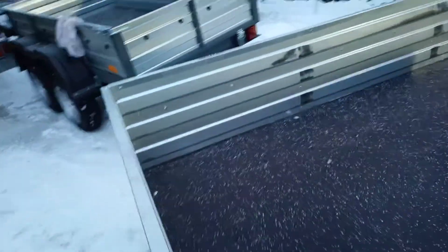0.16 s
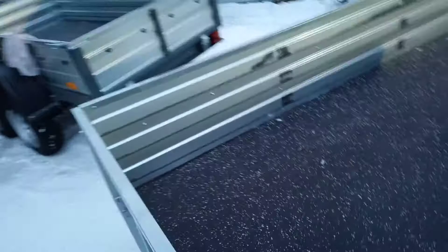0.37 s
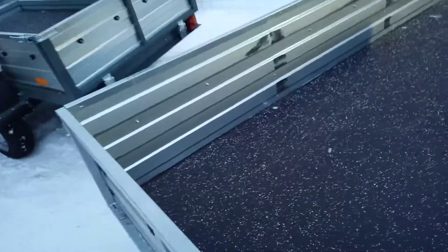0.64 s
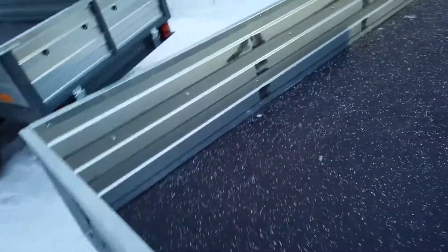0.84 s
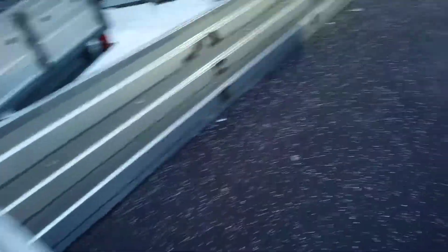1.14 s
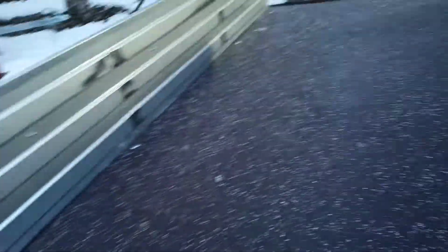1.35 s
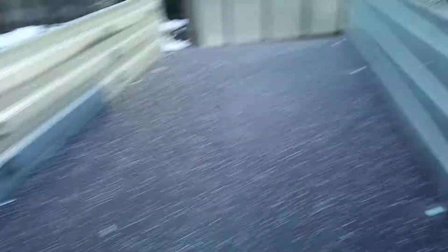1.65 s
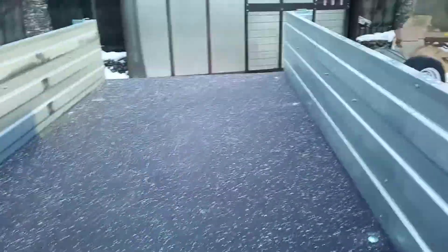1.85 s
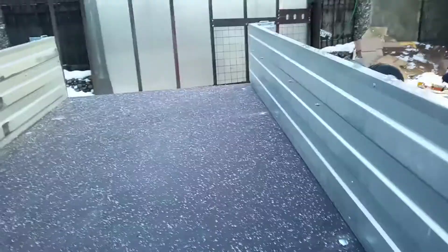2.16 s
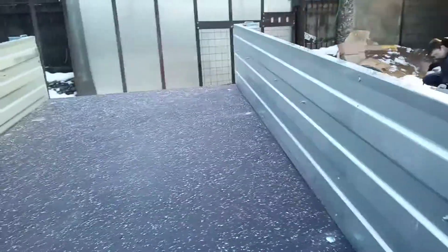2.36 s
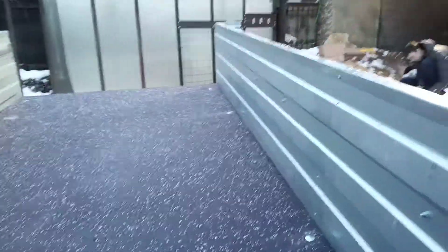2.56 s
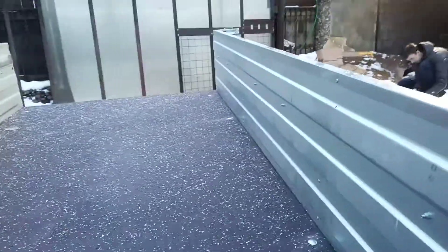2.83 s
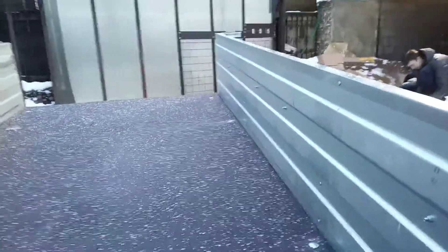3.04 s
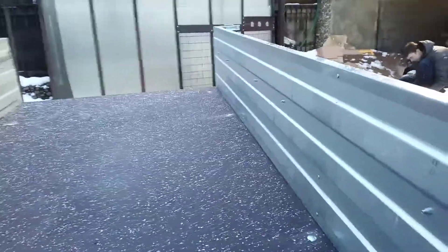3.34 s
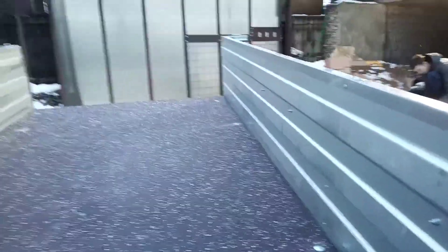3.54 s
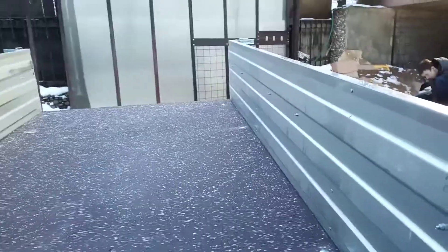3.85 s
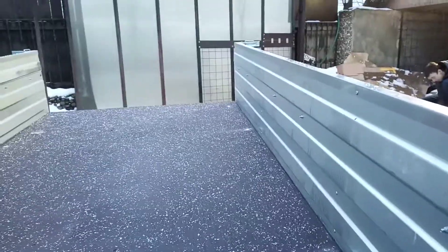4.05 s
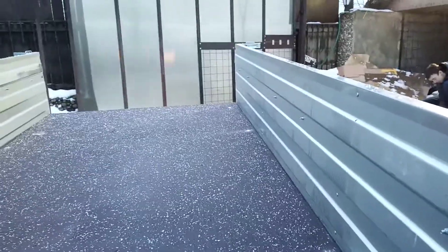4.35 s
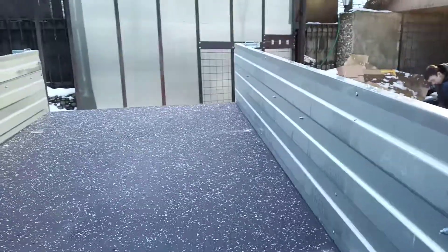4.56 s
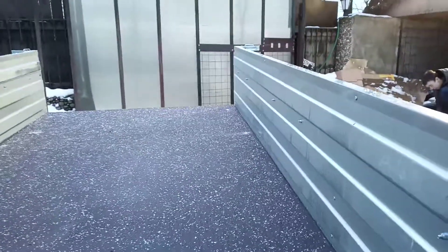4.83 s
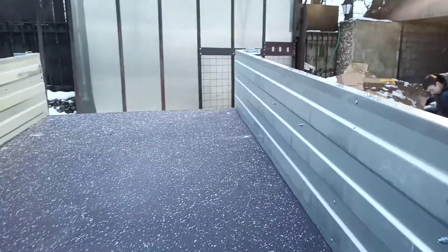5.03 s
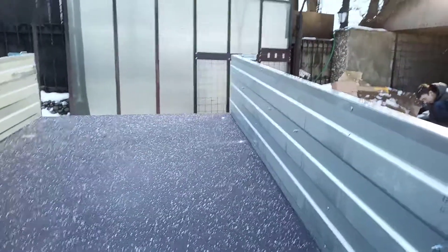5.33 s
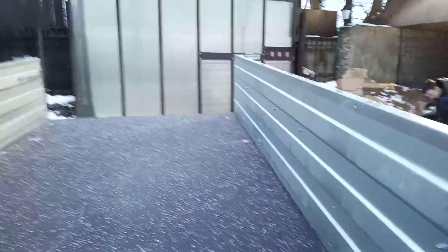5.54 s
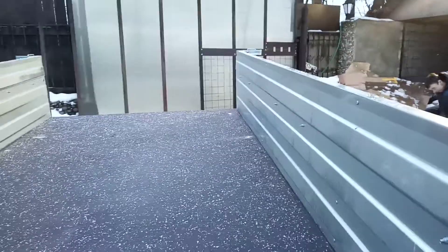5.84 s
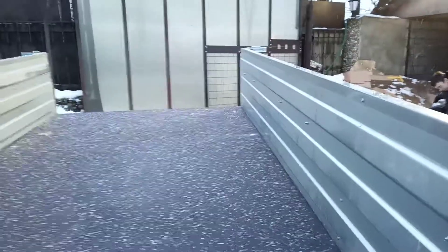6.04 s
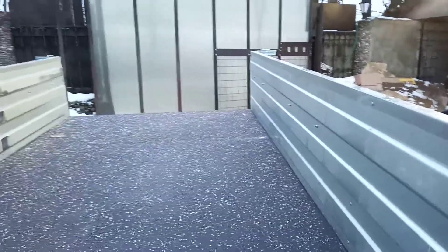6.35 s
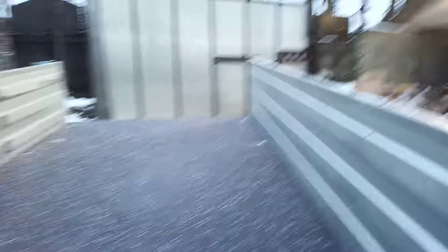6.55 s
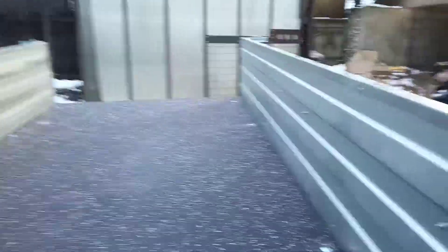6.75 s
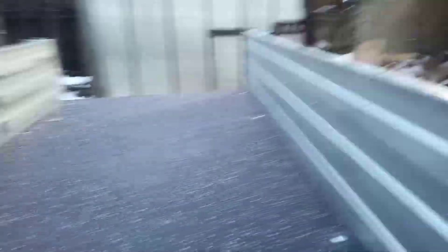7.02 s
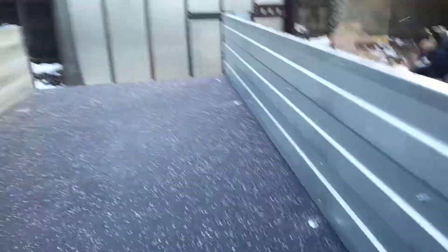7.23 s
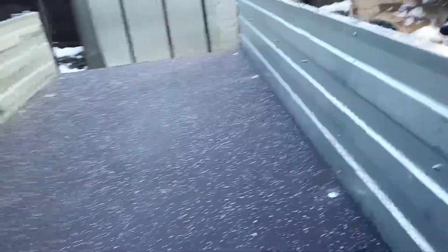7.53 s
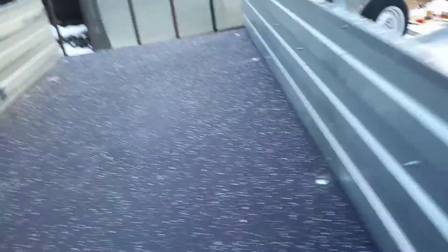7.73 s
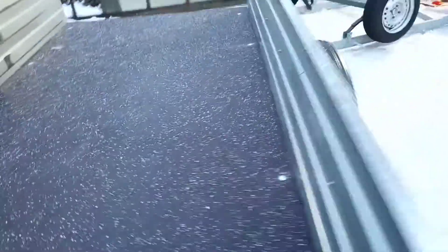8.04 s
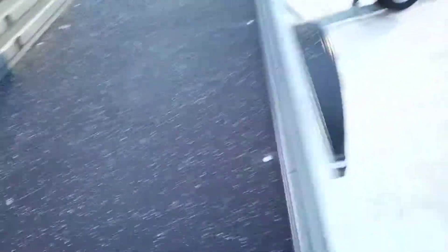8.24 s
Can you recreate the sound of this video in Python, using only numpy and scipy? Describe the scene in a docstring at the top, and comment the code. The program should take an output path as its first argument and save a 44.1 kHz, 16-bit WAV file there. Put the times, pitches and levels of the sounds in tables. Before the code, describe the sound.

A flat trailer bed drops on its metal frame, bouncing faster with hollow booms, then steel latches clank and a rod squeaks briefly.

```python
"""In a quiet, snowy yard, a tipping car trailer with a plywood deck and sheet-steel sides is handled.
The bed drops on its frame and bounces ever faster: bursts of noise for the frame and steel, fading
sine waves for the deck. Steel latches clank, ring and scuff, and a sliding latch rod rasps and squeaks.
Shaped noise makes the deck's rumble under the hand, a jacket's rustle and a faint outdoor hush."""
import sys
import numpy as np
from scipy import signal
from scipy.fft import rfft
from scipy.io import wavfile

SR = 44100
rng = np.random.default_rng(int(sys.argv[2]) if len(sys.argv) > 2 else 0)


def wav_record(signal):
    """Record a signal, one row per channel, as 16-bit PCM in the file named by sys.argv[1]."""
    frames = np.transpose(np.atleast_2d(signal))
    bounded = np.clip(frames, -1, 1)
    # unit amplitude maps onto the largest positive 16-bit level
    quanta = np.round(bounded * 32767).astype(np.int16)
    wavfile.write(sys.argv[1], SR, quanta)


N = 369814

# Ringing tones of the plywood deck: (pitch [Hz], level [dB], time to fade by 60 dB [s])
DECK_MODES = [(57.6, -35, 0.79), (89, -17, 0.48), (104.4, -16.5, 0.79), (125.8, -6, 0.77),
              (169, -4.5, 0.51), (206.5, 0, 0.37), (226.4, -0.5, 0.23), (265, -4.5, 0.3), (315, -8, 0.25),
              (354.4, -16.5, 0.21), (421.5, -19, 0.38), (473, -23, 0.4), (569, -22, 0.22)]
# Ringing tones of the steel sides and fittings: (pitch [Hz], level [dB], time to fade by 60 dB [s])
STEEL_MODES = [(1233, 1, 0.51), (1406, 0, 0.39), (2086, 6, 0.42), (2290, 6, 0.34), (2360, 1, 0.2),
               (2500, 6, .39), (2610, -4, 0.36), (2820, 3, 0.3), (2710, -12, .33), (2770, -9, 0.5),
               (3445, -3, 0.28), (3750, -18, 0.156), (4670, -4, .25), (4960, -1.5, 0.18), (5250, -16, 0.2),
               (5430, -0.5, 0.42), (6020, 15, .25), (6300, 6, 0.12), (6500, 5, 0.21), (6660, -7, .25),
               (7300, -4, 0.21)]
# Tone colour of the frame's many crowded tones: (frequency [Hz], level [dB])
FRAME_COLOUR = [(30, -42), (60, -20.5), (120, 8.5), (300, 6.5), (450, 4.5), (640, -0.5), (850, 3),
                (1100, -3), (1400, -1.5), (1800, -1.5), (2600, -8.5), (5000, -33.5)]
# Tone colour of the sheet steel's many crowded tones: (frequency [Hz], level [dB])
STEEL_COLOUR = [(600, -44.5), (1400, -16), (2000, -13.5), (2700, -1), (3400, -7), (4300, -5.5), (5300, -2),
                (6500, 4), (7200, -9), (8100, -14), (10200, -12.5), (13500, -16), (15500, -23)]
# Strikes of latches and fittings: (time [s], steel level [dB], frame level [dB], deck level [dB],
# brightness [dB per octave], pitch [Hz], time for the crack to fade by 60 dB [s])
LATCH_STRIKES = [(3.13, -26, -44, -48, -2, 4840, 0.13), (3.225, -16.5, -25.5, -29.5, -3, 6100, 0.069),
                 (3.532, -43.5, -47, -55, -9, 6000, .1), (3.57, -45, -57, -51.5, -5, 4830, 0.12),
                 (3.681, -43, -60, -65, -6, 4460, 0.083), (3.772, -26, -35.5, -42.5, -7.5, 6600, 0.071),
                 (4.146, -39.5, -44.5, -55, -9.5, 2260, .13), (4.4, -22, -36.5, -39.5, -6, 2370, .08),
                 (4.41, -21, -46, -40.5, -22, 1580, 0.071), (4.703, -32.5, -46.5, -53, -20, 2580, 0.095),
                 (5.021, -45.5, -48, -53, -9, 2290, 0.13), (6.035, -28, -45, -55, -10, 2590, .075),
                 (6.206, -26.5, -43.5, -48.5, -8.5, 2170, 0.083),
                 (6.86, -34.5, -31.5, -41, -0.5, 2680, .09), (6.886, -14, -36, -48, -7.5, 2370, 0.076),
                 (7.134, -37, -41, -41, -8, 2450, .07)]
RING_S = 0.8   # length made for each landing, rattle and clank


def from_db(db):
    """Turn decibels into a gain."""
    return 10 ** (np.asarray(db) / 20)


def rms_one(x):
    """Scale a sound to an average strength (rms) of 1."""
    return x / np.sqrt(np.mean(x ** 2) + 1e-20)


def seconds(length_s):
    """Give the time of each sample in a short sound."""
    return np.arange(round(length_s * SR)) / SR


def sine(hz, t):
    """A pure tone."""
    return np.sin(2 * np.pi * hz * t)


def gain_curve(rows):
    """Join points of (time [s], level [dB]) into a gain for every sample."""
    return from_db(np.interp(np.arange(N) / SR, *np.transpose(rows)))


def dying(t, t60):
    """A fade that falls by 60 dB in t60 seconds."""
    return np.exp(-np.log(1000) * t / max(t60, 1e-3))


def contact(t, rise_s):
    """The force of a blow builds steadily over a moment."""
    return np.minimum(t / max(rise_s, 1e-4), 1)


def add(track, s, sound):
    """Mix a sound into the track at time s."""
    start = max(round(s * SR), 0)
    track[start:start + len(sound)] += sound[:N - start]


def bins(size):
    """Frequencies of a spectrum in Hz, kept above zero."""
    return np.maximum(np.fft.rfftfreq(size, 1 / SR), 1)


def at_hz(points, hz):
    """Read a tone colour in dB between its points, on a log-frequency scale."""
    corner_hz, db = np.transpose(points)
    return np.interp(np.log(hz), np.log(corner_hz), db)


def noise(shape_db, size):
    """Noise of rms 1 whose spectrum follows the given shape in dB."""
    spectrum = rfft(rng.standard_normal(size)) * from_db(shape_db)
    return rms_one(np.fft.irfft(spectrum, size))


def flutter(per_s, depth_db):
    """A gain that wanders at random, with per_s new values each second."""
    knots = np.arange(N) / SR * per_s
    return from_db(depth_db * np.interp(knots, np.arange(N), rng.standard_normal(N)))


def peak(hz, centre_hz, width_hz):
    """A resonance bump of height 1."""
    return 1 / (1 + (2 * (hz - centre_hz) / width_hz) ** 2)


def sheet_resonances(hz, peak_db=4, width_hz=90, ripple_db=4.5, spacing_hz=55):
    """Ups and downs in dB: the steel's strong tones stand out over a random ripple of weaker ones."""
    strong = np.max([peak(hz, f, width_hz) for f, db, t60 in STEEL_MODES], axis=0)
    weak = np.interp(hz / spacing_hz, np.arange(len(hz)), rng.standard_normal(len(hz)))
    return peak_db * strong + ripple_db * weak


def frame_crack(t, crack_t60, tail_db, tail_t60):
    """The frame's crowded tones sound as noise: a short crack and a softer tail."""
    hz = bins(len(t))
    shape = at_hz(FRAME_COLOUR, hz) + sheet_resonances(hz, ripple_db=3.0, spacing_hz=30)
    fade = np.hypot(dying(t, crack_t60), from_db(tail_db) * dying(t, tail_t60))
    return noise(shape, len(t)) * fade


def steel_crack(t, bright, ring_hz, ring_db, ring_width_hz, crack_t60, tail_db, tail_t60,
                modes_db, tail_dull_db):
    """Sheet steel cracks and rings on; harder contact is brighter, and one pitch region is favoured."""
    hz = bins(len(t))
    octaves = np.log2(np.maximum(hz, 1500) / 4000)
    colour = bright * octaves + ring_db * peak(hz, ring_hz, ring_width_hz)
    shape = at_hz(STEEL_COLOUR, hz) + sheet_resonances(hz) + colour

    mode_hz, mode_db, mode_t60 = np.transpose(STEEL_MODES)
    rings = np.array([sine(f, t) * dying(t, t60) for f, t60 in zip(mode_hz, mode_t60)])
    strength = from_db(mode_db + np.interp(mode_hz, hz, colour)) * rng.standard_normal(len(mode_hz))
    clear_tones = from_db(modes_db) * (strength / np.linalg.norm(strength)) @ rings

    wash = noise(shape + tail_dull_db * np.maximum(octaves, 0), len(t)) * dying(t, tail_t60)
    crack = noise(shape, len(t)) * dying(t, crack_t60)
    return crack + from_db(tail_db) * (wash + clear_tones)


def deck_boom(t, slope_db, centre_hz, focus_db):
    """The deck's low tones throb, most near centre_hz; a quick first push leaves a softer drone."""
    hz, db, t60 = np.transpose(DECK_MODES)
    focus = focus_db * peak(hz, centre_hz, width_hz=70)
    spread = 4.5 * rng.standard_normal(len(hz))   # dB
    strength = from_db(db + slope_db * np.log2(hz / 200) + focus + spread)
    strength = strength * (-1) ** np.arange(len(hz))   # neighbours push in opposite directions
    hz = hz * (1 + 0.031 * rng.standard_normal(len(hz)))   # each boom's tones vary a little in pitch
    boom = sum(gain * sine(f, t) * dying(t, fade) for gain, f, fade in zip(strength, hz, t60))
    boom = boom * (np.exp(-t / 0.093) + from_db(-10))   # first push, then drone
    return boom / boom[:SR // 20].std()


def rocking_boom(t, slope_db, rock_db, rock_s, centre_hz=230, focus_db=2):
    """The deck booms, and again as its far side lands rock_s later."""
    near = deck_boom(t, slope_db, centre_hz, focus_db)
    far = deck_boom(t, slope_db, centre_hz=215, focus_db=4)
    return near + from_db(rock_db) * np.interp(t - rock_s, t, far, left=0)


def yard(level_db=4):
    """The hush of the open air: shaped noise that wavers a little and slowly changes level."""
    # Level of the hush: (time [s], level [dB])
    hush_level = [(0, -55.5), (.33, -57.5), (1.4, -56.5), (1.7, -59.5), (2.2, -57), (2.9, -56.5),
                  (3.9, -53), (4.95, -54), (5.15, -55), (5.5, -58.5), (5.85, -59), (6.2, -60),
                  (6.75, -60.5), (7.05, -55.5), (7.57, -59), (8.39, -60.5)]
    # Tone colour of the open air: (frequency [Hz], level [dB])
    air_colour = [(25, -10), (40, 0), (57, 14), (90, 4), (200, 1), (400, -12), (700, -12), (950, -6.5),
                  (1320, 4), (1850, -4.5), (2550, -2.5), (3700, -13.5), (6300, -8), (8000, -33.5),
                  (11500, -32), (13500, -41), (16000, -40)]
    air = noise(at_hz(air_colour, bins(N)), N)
    return from_db(level_db) * gain_curve(hush_level) * flutter(9, 0.8) * air


def rumble(level_db=-0.5, width_hz=32, lumpy_db=3.5, hand_cut_hz=420):
    """Small uneven pushes of the hand keep the deck's tones murmuring."""
    # Murmur of the deck under the hand: (time [s], level [dB])
    murmur_level = [(0.0, -63), (0.14, -47.5), (0.35, -42), (1.54, -55.5), (1.77, -68.5), (2.3, -60.5),
                    (2.65, -74), (2.85, -57), (3.27, -52.5), (4.1, -57), (4.48, -46), (5.0, -55.5),
                    (5.7, -54), (6.14, -72), (6.58, -53), (6.94, -41.5), (7.31, -44.5), (7.55, -55.5),
                    (8.39, -59.5)]
    hz = bins(N)
    power = sum(from_db(db) ** 2 / (1 + ((hz ** 2 - f ** 2) / (hz * width_hz)) ** 2)
                for f, db, t60 in DECK_MODES)
    soft = 1 / (1 + (hz / hand_cut_hz) ** 4)   # a hand is too soft to stir the treble
    murmur = noise(10 * np.log10(power * soft), N)
    return from_db(level_db) * gain_curve(murmur_level) * flutter(40, lumpy_db) * murmur


def bumps(deck_db=-1, frame_db=-4, firm_db=-37, frame_growth=0.96):
    """The handler bumps the bed: soft bumps mostly stir the deck; firm ones also crack in the frame."""
    # Bumps of the bed: (time [s], level [dB])
    bump_blows = [(0.111, -52), (1.63, -44.5), (1.97, -56), (2.2, -51), (2.25, -52), (2.819, -48.5),
                  (2.92, -51.5), (3.062, -44), (3.322, -35), (3.43, -49.5), (3.533, -48), (4.44, -37.5),
                  (4.511, -44), (5.069, -55), (5.25, -54), (5.421, -55.5), (5.53, -56), (5.63, -47.5),
                  (5.741, -45), (6.0, -53), (6.41, -55), (6.6, -46.5), (6.729, -36.5), (6.859, -40),
                  (6.985, -39), (7.03, -43), (7.149, -40), (7.315, -42), (7.445, -40.5), (7.62, -54),
                  (7.745, -45), (7.843, -45), (7.945, -46), (8.339, -49.5)]
    out, t = np.zeros(N), seconds(0.5)
    for s, db in bump_blows:
        # below firm_db, the frame's share shrinks with the bump
        firmness = from_db(frame_db + frame_growth * min(db - firm_db, 0))
        crack = frame_crack(t, crack_t60=0.13, tail_db=-4.0, tail_t60=0.21)
        frame = firmness * contact(t, rise_s=0.0013) * crack
        boom = rocking_boom(t, slope_db=-1.5, rock_db=-5.5, rock_s=0.024)
        deck = from_db(deck_db) * contact(t, rise_s=0.0049) * boom
        add(out, s, from_db(db) * (deck + frame))
    return out


def grit_snaps(t60=0.0078, width_octaves=0.41, skirt_db=-24):
    """Grit under the moving steel snaps and dies at once, each snap at its own pitch."""
    # Snaps of grit: (time [s], level [dB], centre of the noise [Hz])
    snap_blows = [(.135, -45, 5500), (.173, -26, 13000), (.22, -28, 6500), (.429, -33, 6700),
                  (.872, -41.5, 5600), (5.807, -47, 6400)]
    out, t = np.zeros(N), seconds(0.05)
    octaves = np.log2(bins(len(t)))
    for s, db, hz in snap_blows:
        shape = skirt_db * (1 - peak(octaves, np.log2(hz), 2 * width_octaves))
        add(out, s, from_db(db) * noise(shape, len(t)) * dying(t, t60))
    return out


def bounces(steel_db=-9.5, sway_reference_db=-17.5):
    """The bed lands ever faster and mostly weaker on its frame; heavy landings sway it more."""
    # Each landing in turn: (frame level [dB], deck level [dB], centre of the boom [Hz],
    # far side against near side [dB])
    landing_blows = [(-21, -21.5, 273, -13), (-21, -24, 214, 1), (-31.5, -29.5, 298, 3),
                     (-33.5, -37.5, 157, 0.5), (-30.5, -34, 150, -1), (-38, -38, 140, -1.5),
                     (-41.5, -42, 150, 1.5), (-40, -41.5, 150, -0.5), (-45.5, -44.5, 180, 0.5)]
    drop_s, first_gap_s, gap_kept = 0.168, 0.2115, 0.9195   # each gap is a fixed share of the last
    sway_db, sway_growth, sway_rise_s = -4, 0.6, 0.052   # sway_growth: dB per dB of the blow
    out, t = np.zeros(N), seconds(RING_S)
    s = drop_s
    for k, (frame_db, deck_db, centre_hz, rock_db) in enumerate(landing_blows):
        frame = frame_crack(t, crack_t60=0.12, tail_db=-8.0, tail_t60=0.41)
        steel = steel_crack(t, bright=-0.5, ring_hz=2010, ring_db=5.0, ring_width_hz=2800,
                            crack_t60=0.18, tail_db=-6.5, tail_t60=0.54, modes_db=-13,
                            tail_dull_db=-25)
        metal = contact(t, rise_s=0.0011) * (frame + from_db(steel_db) * steel)

        boom = rocking_boom(t, slope_db=0, rock_db=rock_db, rock_s=0.021,
                            centre_hz=centre_hz, focus_db=14.0)
        sway_hz = 86 * (1 + 0.1 * rng.standard_normal())
        # the sway's strength is reckoned from a reference landing level
        sway_gain = from_db(sway_db + sway_growth * (frame_db - sway_reference_db))
        sway_fade = contact(t, sway_rise_s) * dying(np.maximum(t - sway_rise_s, 0), t60=0.26)
        sway = sway_gain * sine(sway_hz, t) * sway_fade
        deck = contact(t, rise_s=0.008) * boom + sway

        add(out, s, from_db(deck_db) * deck + from_db(frame_db) * metal)
        s += first_gap_s * gap_kept ** k
    return out


def rattles(hinge_db=-3, spread_db=3, detune=0.006):
    """A loose steel side slaps its hinge with a bright, high ring."""
    # Slaps of the loose side: (time [s], level [dB], brightness [dB per octave])
    side_slaps = [(.183, -32, 7), (.208, -35.5, -6), (.241, -27.5, 2.5), (0.394, -31.5, 4.5),
                  (0.593, -40, 1.5), (.764, -47, 4.5), (.924, -45.5, 3), (1.06, -42, 13), (1.347, -49, 4)]
    # Ringing tones of the hinge: (pitch [Hz], level [dB], time to fade by 60 dB [s])
    hinge_modes = [(6120, -5.5, 0.14), (6250, -1, 0.17), (6500, -7.5, .16), (9372, -17, 0.35),
                   (9560, -18.5, .14), (10120, -11, .12)]
    out, t = np.zeros(N), seconds(RING_S)
    for s, db, bright in side_slaps:
        steel = steel_crack(t, bright, ring_hz=6440, ring_db=2.0, ring_width_hz=320,
                            crack_t60=0.19, tail_db=-10.5, tail_t60=0.45, modes_db=-1.0,
                            tail_dull_db=-21)
        hinge = np.zeros(len(t))
        for hz, mode_db, t60 in hinge_modes:
            gain = from_db(mode_db + spread_db * rng.standard_normal())
            pitch_hz = hz * (1 + detune * rng.standard_normal())
            hinge += gain * sine(pitch_hz, t) * dying(t, t60)
        slap = contact(t, rise_s=0.0012) * (steel + from_db(hinge_db) * hinge)
        add(out, s, from_db(db) * slap)
    return out


def jacket(level_db=6, grain_db=3.5):
    """Fabric slides on fabric in smooth strokes: a fine, grainy hiss."""
    # Strokes of the sleeve: (middle [s], level [dB], half length [s])
    sleeve_strokes = [(1.1, -62, 0.29), (2.165, -58.5, 0.15), (2.958, -64.5, 0.051), (3.656, -66.5, 0.08),
                      (5.252, -65, 0.089), (5.663, -64, 0.028), (6, -68, 0.11), (6.486, -58.5, 0.027),
                      (7.325, -60, 0.078), (7.82, -69.5, 0.17), (8.14, -60.5, 0.1)]
    # Tone colour of the cloth: (frequency [Hz], level [dB])
    cloth_colour = [(800, 14), (1400, 16), (2600, 16.5), (3600, 9.5), (5000, 14), (6400, 21.5), (7300, 9.5),
                    (8300, -2), (11500, 7.5), (13500, -2), (15500, 8.5)]
    t = np.arange(N) / SR
    speed = sum(from_db(db) * np.exp(-0.5 * ((t - s) / half) ** 2) for s, db, half in sleeve_strokes)
    hiss = noise(at_hz(cloth_colour, bins(N)), N)
    return from_db(level_db) * speed * flutter(180, grain_db) * hiss


def scuffs(grain_db=4.0, grains_per_s=420, steel_db=-3, top_hz=8500, ring_db=7, ring_width_hz=800):
    """Short gritty rubs of steel on the frame swell and die away."""
    # Rubs: (time [s], level [dB], rise [s], time to fade by 60 dB [s],
    # brightness [dB per octave], favoured pitch [Hz])
    steel_rubs = [(2.812, -38, .012, 0.3, 3.5, 2500), (2.988, -48.5, .018, .13, 3, 2400),
                  (3.025, -45.5, .016, 0.17, 0, 2400), (6.199, -36, 0.0078, 0.07, 2.5, 2500),
                  (6.728, -37.5, .003, 0.28, -3, 1930), (6.873, -35, 0.013, .08, 1, 2400),
                  (6.959, -45, 0.01, 0.21, -4, 2400), (7.314, -39.5, 0.0093, 0.23, -4.5, 1450),
                  (7.431, -37.5, 0.0027, 0.19, -4.5, 1500), (7.48, -42, 0.017, 0.07, -2, 1910)]
    out, t = np.zeros(N), seconds(0.5)
    hz = bins(len(t))
    frame = from_db(at_hz(FRAME_COLOUR, hz))
    steel = from_db(at_hz(STEEL_COLOUR, hz) + steel_db)
    both = np.hypot(frame, steel) / np.sqrt(1 + (hz / top_hz) ** 4)   # softer above top_hz
    for s, db, rise_s, t60, bright, ring_hz in steel_rubs:
        tilt = bright * np.log2(np.clip(hz, 200, 6000) / 1000)
        ring = ring_db * peak(hz, ring_hz, ring_width_hz)
        shape = 20 * np.log10(both) + sheet_resonances(hz) + tilt + ring
        swell = contact(t, rise_s) * dying(np.maximum(t - rise_s, 0), t60)
        grit = rms_one(flutter(grains_per_s, grain_db)[:len(t)])
        add(out, s, from_db(db) * swell * grit * noise(shape, len(t)))
    return out


def bolt(spread_db=3.5):
    """The latch bolt rings with a few clear tones, some in close pairs."""
    # Strikes on the bolt: (time [s], level [dB])
    bolt_strikes = [(2.822, -36.5), (3.13, -26), (3.226, -29), (3.572, -43.5), (3.683, -47)]
    # Ringing tones of the bolt: (pitch [Hz], level [dB], time to fade by 60 dB [s])
    bolt_modes = [(2385, -3, 0.14), (4160, -1.5, 0.081), (4760, -7, 0.13), (4920, -4.5, 0.13),
                  (5140, -10, 0.13), (6170, -11, 0.14), (6230, -0.5, 0.08), (6662, -17, 0.15),
                  (7300, -14, .16)]
    out, t = np.zeros(N), seconds(0.5)
    for s, db in bolt_strikes:
        ring = np.zeros(len(t))
        for hz, mode_db, t60 in bolt_modes:
            gain = from_db(mode_db + spread_db * rng.standard_normal())
            tone = np.sin(2 * np.pi * (hz * t + rng.random()))   # starts anywhere in its cycle
            ring += gain * tone * dying(t, t60)
        add(out, s, from_db(db) * contact(t, rise_s=0.0023) * ring)
    return out


def latches(tail_db=-6, tail_db_per_bright=1.3, rise_cycles=7):
    """Clanks crack in the steel and jolt frame and deck; bright strikes ring on, dull ones are damped."""
    out, t = np.zeros(N), seconds(RING_S)
    for s, steel_db, frame_db, deck_db, bright, hz, crack_t60 in LATCH_STRIKES:
        steel = steel_crack(t, bright, hz, ring_db=4.5, ring_width_hz=1000, crack_t60=crack_t60,
                            tail_db=tail_db + tail_db_per_bright * min(bright, 0),
                            tail_t60=0.32, modes_db=-3, tail_dull_db=-3)
        frame = frame_crack(t, crack_t60=0.082, tail_db=-4.5, tail_t60=0.46)
        deck = rocking_boom(t, slope_db=7.5, rock_db=-6.5, rock_s=0.026)
        clank = from_db(steel_db) * steel + from_db(frame_db) * frame + from_db(deck_db) * deck
        add(out, s, contact(t, rise_cycles / hz) * clank)
    return out


def latch_ticks(ping_db=-8, ping_db_per_bright=3.0, snap_db=-1, snap_db_per_bright=3.3):
    """Strikes begin with a brief snap and a very high ping of a small, hard part; dull ones have less."""
    out, t = np.zeros(N), seconds(0.2)
    hz = bins(len(t))
    ping_shape = 20 * np.log10(peak(hz, centre_hz=15600, width_hz=1200))
    snap_shape = at_hz(STEEL_COLOUR, hz) + 3 * np.log2(hz)   # 3 dB brighter per octave
    for s, steel_db, frame_db, deck_db, bright, pitch_hz, crack_t60 in LATCH_STRIKES:
        dullness = min(bright, 0)
        ping_gain = from_db(ping_db + ping_db_per_bright * dullness)
        ping = ping_gain * noise(ping_shape, len(t)) * dying(t, t60=0.05)
        snap_gain = from_db(snap_db + snap_db_per_bright * dullness)
        snap = snap_gain * noise(snap_shape, len(t)) * dying(t, t60=0.033)
        add(out, s, from_db(steel_db) * (ping + snap))
    return out


def rasp(start_s=6.91, level_db=-39.5, frame_db=-1.0, steel_db=-3.0):
    """Under its squeaks the latch rod grates along its guide: dense, grainy noise that fades away."""
    out, t = np.zeros(N), seconds(1)
    hz = bins(len(t))
    frame = noise(at_hz(FRAME_COLOUR, hz) + sheet_resonances(hz), len(t))
    tilt = -7.0 * np.log2(hz / 4000)   # 7 dB duller per octave
    rod = 3 * peak(hz, centre_hz=2450, width_hz=1300)
    steel = noise(at_hz(STEEL_COLOUR, hz) + sheet_resonances(hz) + tilt + rod, len(t))
    grains = flutter(per_s=700, depth_db=3.2)[:len(t)]
    sliding = contact(t, rise_s=0.012) * dying(t, t60=1.3) * grains
    grating = from_db(frame_db) * frame + from_db(steel_db) * steel
    add(out, start_s, from_db(level_db) * sliding * grating)
    return out


def squeaks(ring_db=-3, grit_db=-6):
    """The rod sticks and slips evenly; each slip squeaks upward as it speeds up, grates and rings."""
    first_slip_s, slip_gap_s, slip_count = 6.971, 0.0272, 12
    hardest_slip_s, slip_db, fade_db_per_s = 7, -33.5, 33   # slips swell to this moment, then fade
    last_slip_db, limp_db, spread_db = 2, 1.5, 1.0   # closing jerk; every other slip is stronger
    start_hz, end_hz, length_s, pitch_spread = 1950, 3150, 0.0076, 0.033
    out, t = np.zeros(N), seconds(0.2)
    progress = np.minimum(t / length_s, 1)
    hz = bins(len(t))
    grit_shape = at_hz(STEEL_COLOUR, hz) - 10 * np.log2(hz)   # 10 dB duller per octave
    for k in range(slip_count):
        s = first_slip_s + slip_gap_s * k
        db = slip_db - fade_db_per_s * abs(s - hardest_slip_s)
        db += last_slip_db * (k == slip_count - 1) - limp_db * (-1) ** k
        db += spread_db * rng.standard_normal()

        pitch = start_hz + (end_hz - start_hz) * progress
        pitch = pitch * (1 + pitch_spread * rng.standard_normal())
        rough = rms_one(flutter(1400, 3.5)[:len(t)])
        sweep = rough * np.sin(np.pi * progress) * np.sin(2 * np.pi * np.cumsum(pitch) / SR)

        # the squeak sets the steel ringing: spread it out over fading noise
        steel = rng.standard_normal(len(t)) * dying(t, t60=0.1)
        ringing = signal.fftconvolve(sweep, steel / np.linalg.norm(steel))[:len(t)]
        grit = noise(grit_shape, len(t)) * dying(t, t60=0.068)
        add(out, s, from_db(db) * (sweep + from_db(ring_db) * ringing + from_db(grit_db) * grit))
    return out


def taps(level_db=-2.5, click_db=-4, overtone_db=-9, overtone=1.19, shiver_db=-19):
    """Dry, hollow taps: a dull click, two quickly damped tones, a low thud and a shiver of the frame."""
    # Taps close by: (time [s], body level [dB], pitch [Hz], time to fade by 60 dB [s], thud level [dB])
    tap_blows = [(7.073, -19, 660, 0.025, -23), (7.135, -41, 563, 0.037, -38),
                 (7.938, -33, 633, 0.029, -37), (8.21, -41.5, 636, 0.046, -47),
                 (8.297, -30.5, 1326, 0.03, -56)]
    out, t = np.zeros(N), seconds(0.2)
    low_pass = signal.butter(2, 2400, fs=SR, output="sos")
    for s, db, hz, t60, thud_db in tap_blows:
        tones = sine(hz, t) - from_db(overtone_db) * sine(overtone * hz, t)
        body = tones * dying(t, t60)
        dull_noise = rms_one(signal.sosfilt(low_pass, rng.standard_normal(len(t))))
        click = from_db(click_db) * dull_noise * dying(t, t60=0.0089)
        shiver = from_db(shiver_db) * frame_crack(t, crack_t60=0.038, tail_db=-2, tail_t60=0.16)
        thud = from_db(thud_db) * sine(150, t) * dying(t, t60=0.079)
        add(out, s, from_db(db) * (body + click + shiver) + thud)
    return from_db(level_db) * out


def scene():
    """The yard, the trailer and its handler, mixed to one channel."""
    bed = rumble() + bumps() + grit_snaps() + bounces() + rattles()
    fittings = scuffs() + bolt() + latches() + latch_ticks() + rasp() + squeaks()
    return (yard() + bed + jacket() + fittings + taps())[None]


def record(dry):
    """Cut the lowest bass (below 38 Hz) and the very top (above 16100 Hz)."""
    high_pass = signal.butter(2, 38, "high", fs=SR, output="sos")
    low_pass = signal.ellip(10, 0.2, 70, 16100, fs=SR, output="sos")
    thin = signal.sosfilt(high_pass, dry)
    return signal.sosfilt(low_pass, thin)


dry = scene()
out = record(dry)
wav_record(out)
```